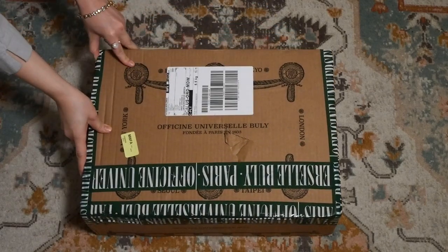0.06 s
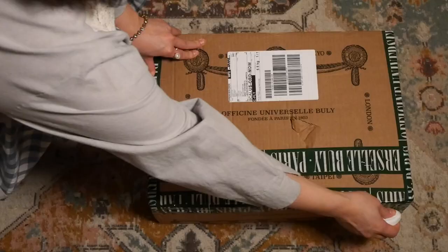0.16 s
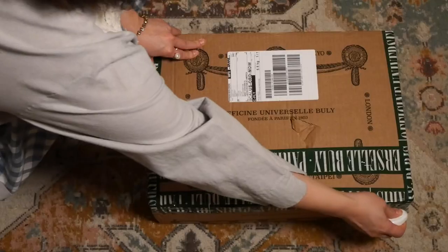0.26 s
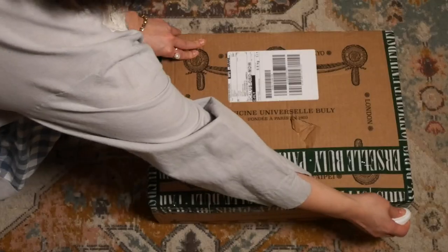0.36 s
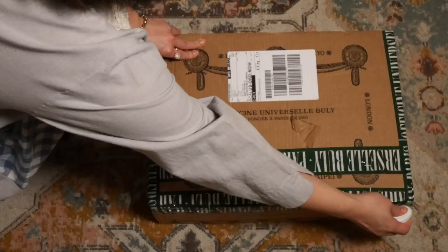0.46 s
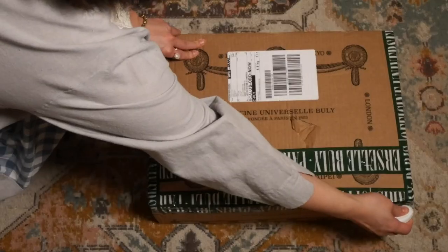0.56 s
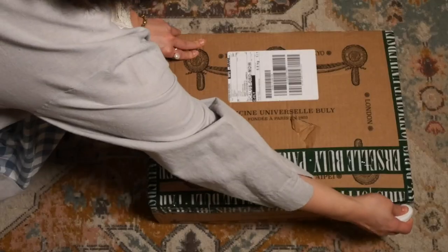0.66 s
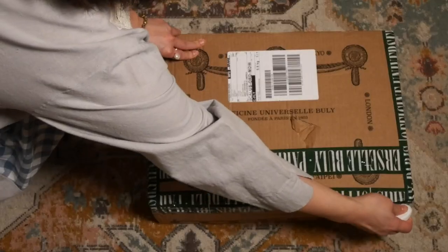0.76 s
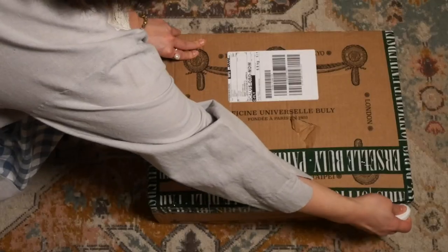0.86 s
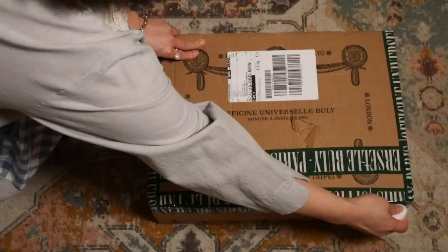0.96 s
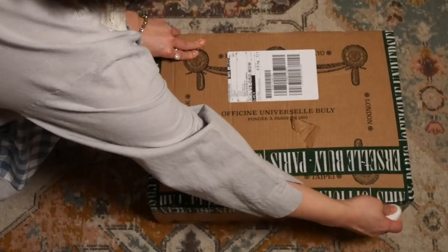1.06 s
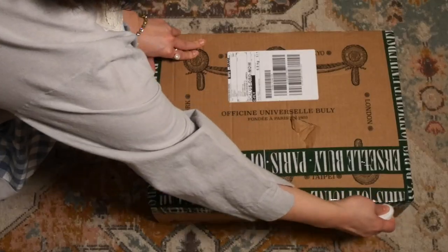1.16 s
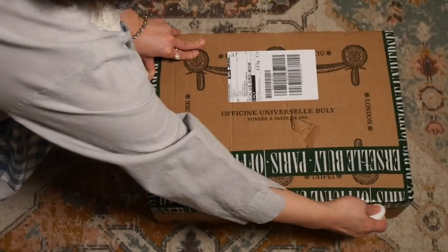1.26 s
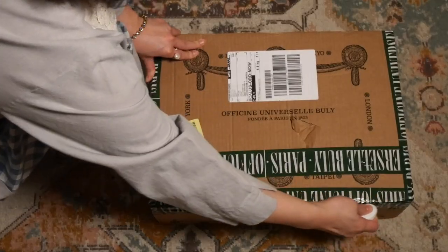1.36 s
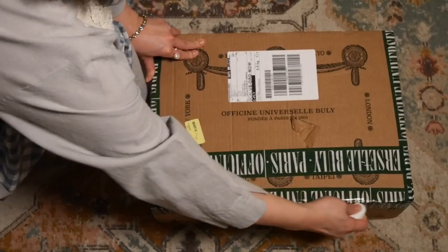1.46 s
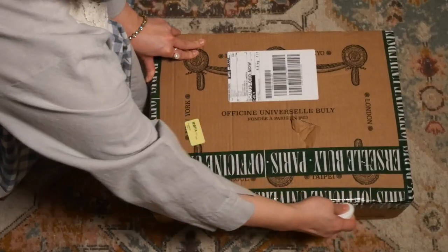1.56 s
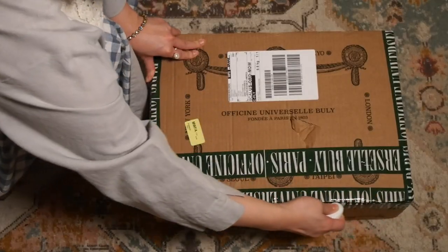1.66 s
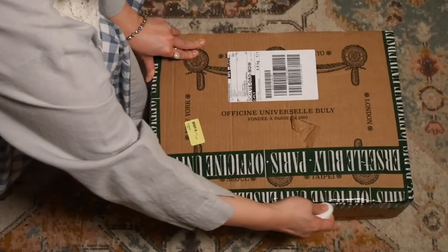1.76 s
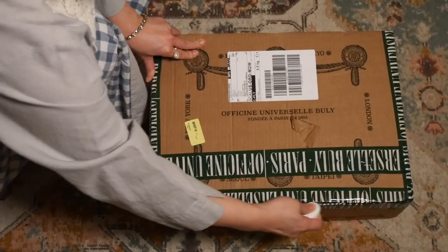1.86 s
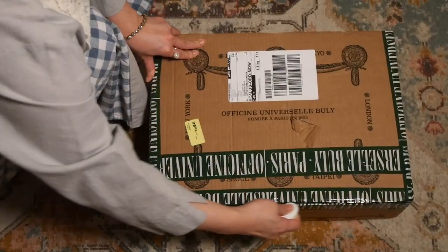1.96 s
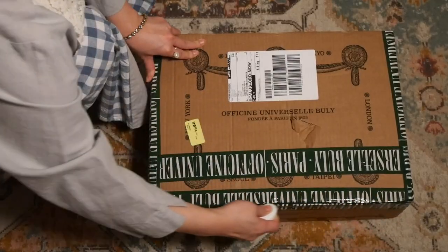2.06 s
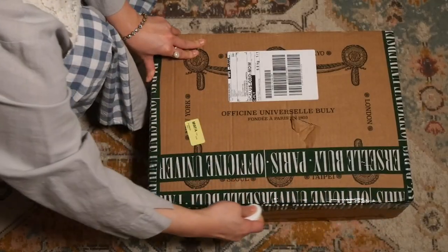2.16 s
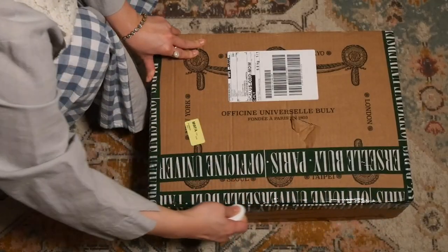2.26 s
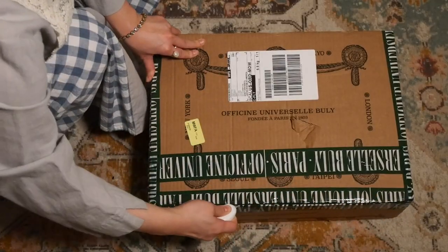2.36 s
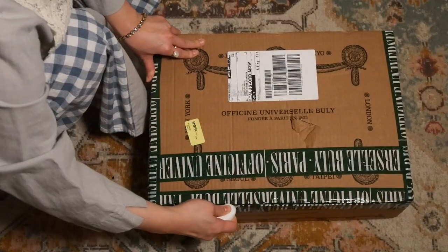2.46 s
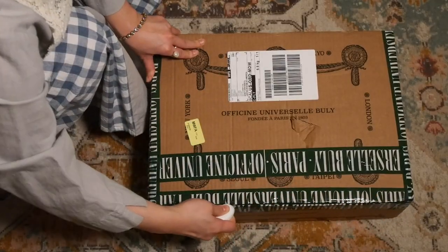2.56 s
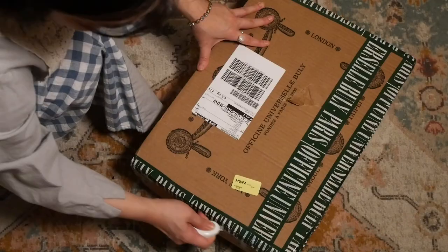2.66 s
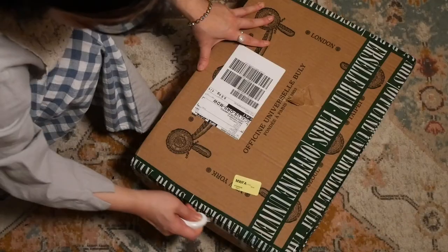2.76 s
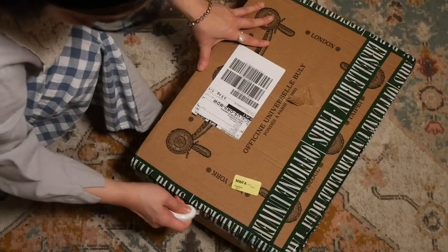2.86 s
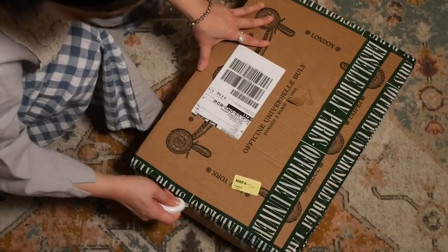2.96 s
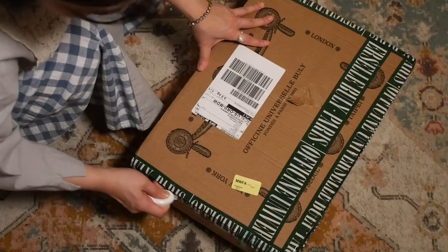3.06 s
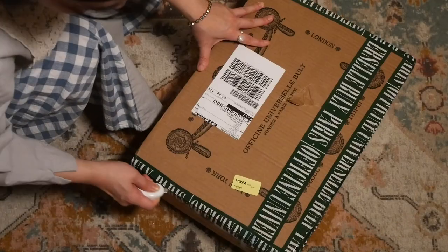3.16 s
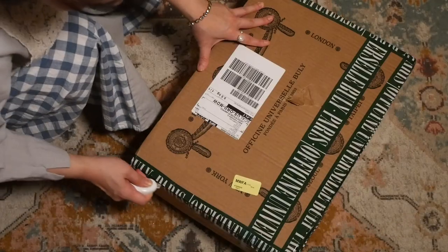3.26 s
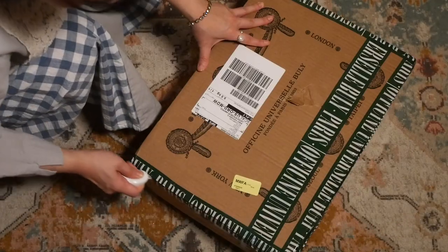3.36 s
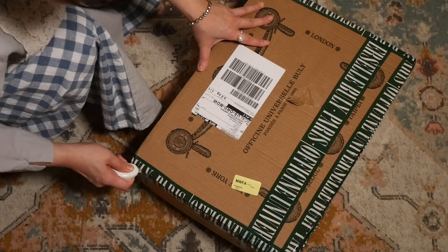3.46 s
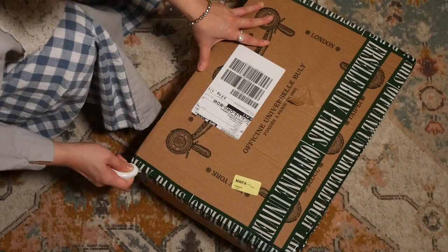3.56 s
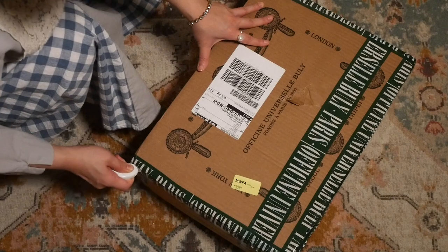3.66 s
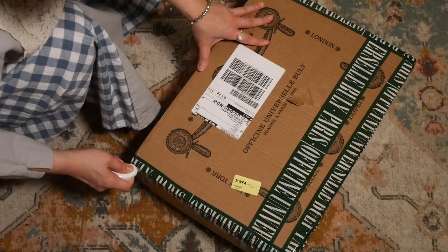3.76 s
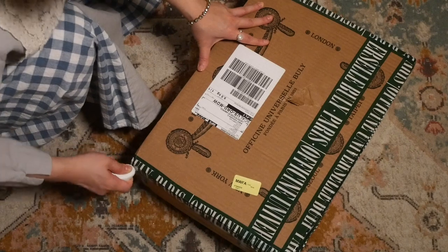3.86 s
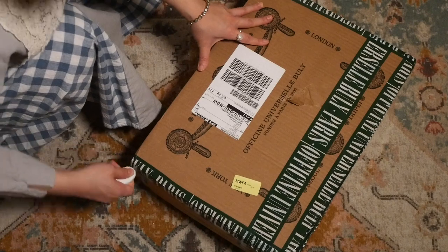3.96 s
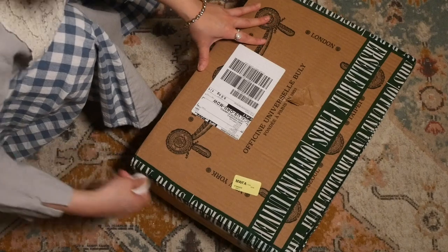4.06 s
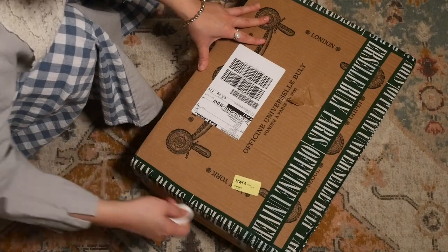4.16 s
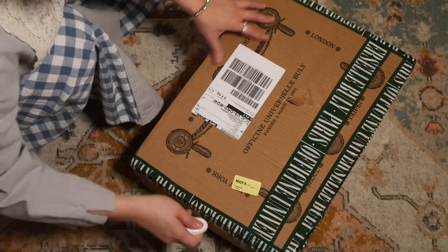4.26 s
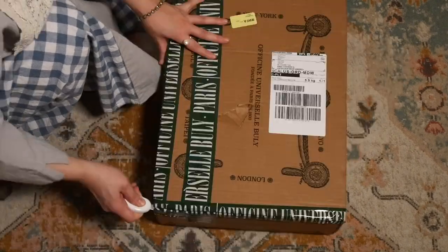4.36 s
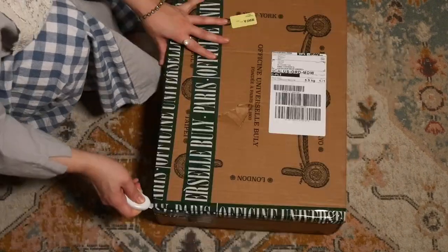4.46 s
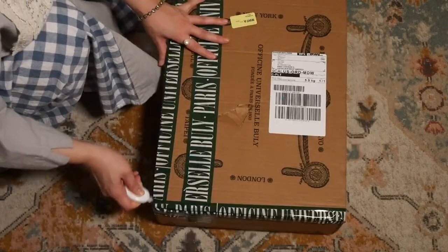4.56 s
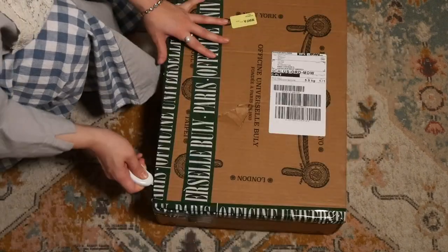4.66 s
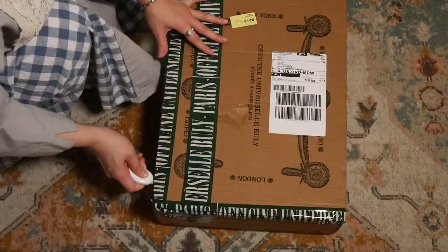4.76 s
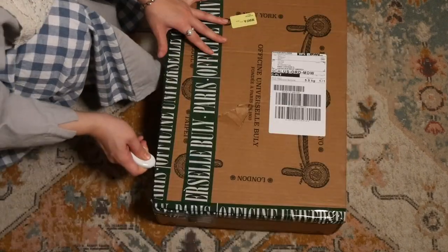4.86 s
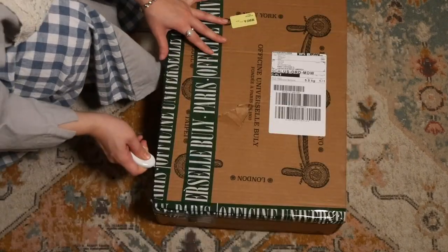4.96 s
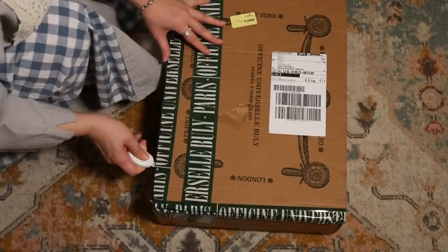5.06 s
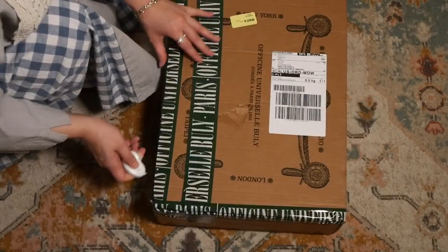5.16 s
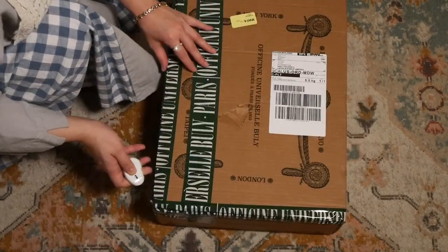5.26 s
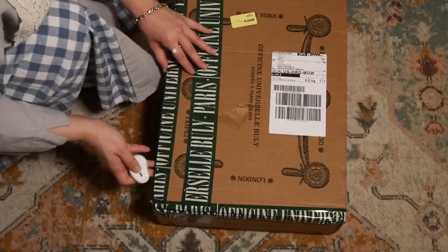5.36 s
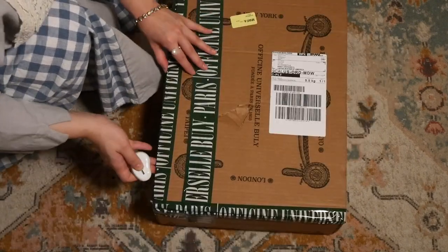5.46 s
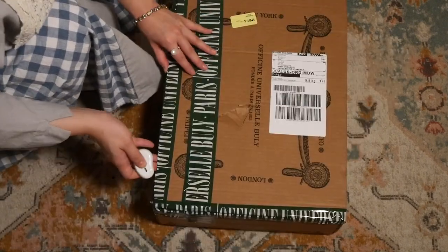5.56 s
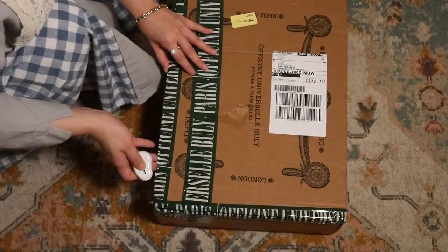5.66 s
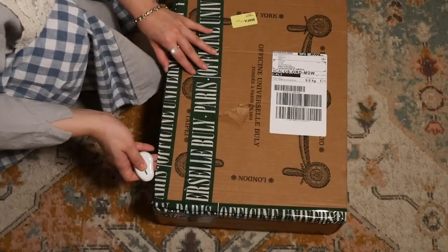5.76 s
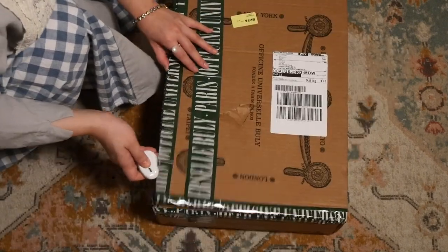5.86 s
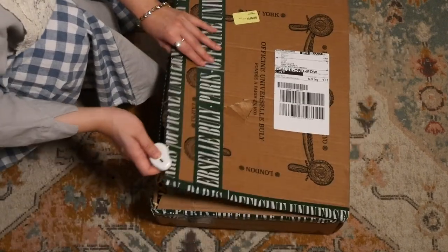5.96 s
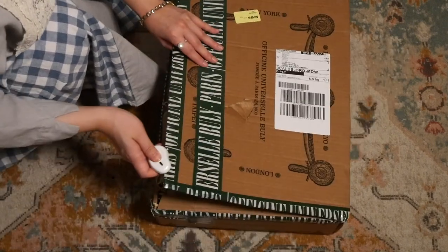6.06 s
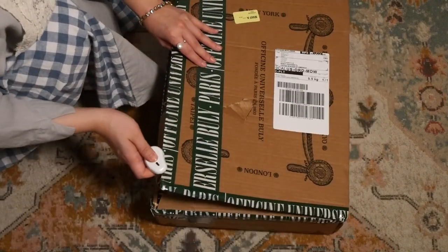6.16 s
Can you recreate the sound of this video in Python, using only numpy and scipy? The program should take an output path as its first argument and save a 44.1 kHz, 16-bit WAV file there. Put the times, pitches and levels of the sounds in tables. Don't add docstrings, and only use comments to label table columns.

```python
import sys
import numpy as np
from scipy import signal
from scipy.fft import rfft, irfft
from scipy.io import wavfile
from scipy.ndimage import uniform_filter1d

SR = 44100
rng = np.random.default_rng(int(sys.argv[2]) if len(sys.argv) > 2 else 0)


def put_to_file(sound):
    columns = np.atleast_2d(sound).T
    safe = np.clip(columns, -1, 1)
    whole_steps = np.round(safe * 32767)
    wavfile.write(sys.argv[1], SR, whole_steps.astype(np.int16))


def makeup_ratio(level_db):
    decades = np.asarray(level_db, float) / 20
    return 10 ** decades


N = 274302

# [f/Hz, level/dB per Hz]
HUSH_SPECTRUM = [(12, -41), (20, -10), (217, -5.5), (381, -7.5), (549, -17), (632, 6), (813, -22),
                 (1110, -8), (1470, -26), (2800, -20), (4000, -17.5), (6310, -19), (14700, -23),
                 (16400, -10.5)]
# [f/Hz, width/Hz, level/dB]
HUM_MODES = [(396, 44, 0.5), (614, 38, 3), (1048, 20, -0.5), (2120, 210, -10.5)]
HUSH_DB = -59
ROOM_T60_S, ROOM_DB, SIDE_DB = 0.19, -5, -24.5

# [f/Hz, width/Hz, level/dB]
PANEL_MODES = [(170, 33, 0), (282.5, 22, 4), (390, 9.8, -8.5), (513, 98, 8.5), (634.6, 21, 5),
               (742, 37, 4.5), (891, 31, -4), (1110, 70, 8), (1280, 250, -14), (1570, 520, 33.5)]
STAGE_STARTS_S = [
    2.52,
    3.31,
    4.4,
    5.74,
]
# [f/Hz, level/dB per Hz]
STAGE_RUMBLE = [
    [(120, -64), (210, -5), (288, 5.5), (426, 1), (1050, -1.5), (1620, -12), (2200, -10.5), (2860, -42),
     (4840, -120)],
    [(120, -62), (210, -12), (324, -6), (509, -2), (676, -6.5), (1350, -4.5), (2200, -17), (2860, -61),
     (4840, -120)],
    [(120, -43), (180, -8), (300, -6.5), (480, -3), (650, -5.5), (1100, -9), (2200, -17.5), (2860, -64),
     (4840, -120)],
    [(120, -40), (210, -11), (398, -2.5), (964, -11.5), (1400, -16), (1650, -23.5), (2200, -14.5),
     (2860, -60), (4840, -120)],
    [(120, -36), (210, -6), (354, -11.5), (398, -5.5), (556, -9.5), (650, -8.5), (2200, -20), (2860, -62),
     (4840, -120)],
]
# [f/Hz, level/dB per Hz]
STAGE_HISS = [
    [(1120, 5), (1900, -5), (2500, -5.5), (3100, -2), (3810, -2), (4130, -5), (4660, -3.5), (5760, -7.5),
     (6870, 2.5), (8500, -2.5), (11000, -17), (18700, -120)],
    [(1120, -13), (1900, -8), (2070, -10.5), (2980, -8), (3810, -4), (5910, -3), (6250, -0.5), (6830, -9),
     (8500, -8.5), (11000, -28), (18700, -120)],
    [(1120, -6), (1900, -4), (2600, -11.5), (3300, -1.5), (4600, -5.5), (5300, -3), (6250, -5),
     (8500, -9.5), (11000, -31), (18700, -120)],
    [(1120, -2), (1900, -3), (2910, -7), (3260, -2), (3910, -4.5), (4690, -7), (5350, -4), (5950, -2.5),
     (8500, -9), (11000, -62), (18700, -120)],
    [(1120, -24), (1900, -24), (2500, -13.5), (3200, -11), (4320, -14), (6250, -16), (8500, -19),
     (11000, -47), (18700, -120)],
]
# [f/Hz, level/dB per Hz]
RUSTLE_SPECTRUM = [(3820, -59), (6500, -7), (8460, -10), (9610, 5), (13600, 5), (15500, 1.5), (16100, -36),
                   (16400, -44)]
# [f/Hz, width/Hz]
AIR_MODES = [(120, 11), (170, 33), (175, 78), (154, 90), (158.5, 82)]
STAGE_CLUMP_DB = (2.15, 1.6, 2.06, 4.4, 3.3)
STAGE_RUSTLE_DB = (-5.5, -2.5, -1.5, -3.5, -3.5)
STAGE_AIR_DB = (-21, -16, -17, -13.5, -15.5)
RUSTLE_DB_PER_PRESS_DB, AIR_DB_PER_PRESS_DB = -0.18, 0.47

# [t/s, panel rumble level/dB]
HAND_SHIFTS = [(0, -50), (.046, -63), (.35, -60), (.67, -57), (.93, -53.5), (2.3, -53), (2.5, -68),
               (3.6, -67), (3.75, -53.5), (4.1, -61.5), (4.46, -76), (5.01, -61), (5.24, -70),
               (5.45, -61.5), (5.52, -55), (5.75, -44), (5.8, -70), (6.22, -65)]
HAND_HISS_DB, HAND_AIR_DB = -10.5, -6.5
# [t/s, blade speed as hiss level/dB, pressure as rumble above hiss/dB]
BLADE_CUTS = [
    [(.93, -75, 5), (.945, -56.5, 0), (1.066, -47, 2.5), (1.13, -46.5, 6), (1.228, -36.5, -6.5),
     (1.322, -40.5, -2.5), (1.47, -38.5, -4), (1.864, -37.5, -4.5), (2.033, -41.5, 9.5), (2.2, -50, -9)],
    [(2.66, -32, -2), (2.79, -31, -3.5), (2.872, -32, -2.5), (3.01, -31, -5), (3.206, -32.5, -1),
     (3.298, -41, -2.5), (3.366, -34, 3), (3.49, -37, 1.5), (3.6, -95, 18)],
    [(4.2, -58, -24), (4.259, -48, -2.5), (4.358, -52.5, -1.5)],
    [(4.548, -47, -5), (4.584, -36, 0.5), (4.656, -28.5, 4.5), (4.785, -70, 12)],
]
# [peak t/s, hiss level/dB, rise/ms per 20 dB, fall/ms per 20 dB, rumble above hiss/dB]
BLADE_JERKS = [(.37, -66, 104, 116, 13), (.722, -67, 60, 300, -7), (1.488, -32.5, 38, 106, 2),
               (1.881, -45, 18, 85, 15.5), (1.96, -35.5, 61, 145, -31), (2.205, -35.5, -5, 62, 3.5),
               (2.332, -37.5, 60, 80, -14), (2.395, -47, 90, 68, 0.5), (2.612, -41, 64, 75, -1),
               (3.324, -38.5, 2, 120, 9.5), (3.831, -40, 68, 106, -2), (3.962, -38, 17, 95, 1),
               (4.153, -44, 27, 68, -27), (4.506, -54, 31, 250, 9.5), (4.794, -36.5, 1.5, 119, 3.5),
               (4.867, -40.5, 85, 39, 10.5), (5.173, -52.5, 194, 191, 2), (5.523, -60.5, 20, 389, -16),
               (5.768, -46.5, 31, 150, 14), (5.844, -34, 111, 100, 3.5), (6.124, -45, 1, 300, -1.5)]
# [t/s, speed as hiss level/dB, pressure as rumble above hiss/dB]
LID_TEAR = [
    (5.862, -21, 6),
    (5.892, -23.5, 6),
    (5.897, -18, 5.5),
    (5.966, -30.5, 1),
    (5.972, -30, 12),
    (6.015, -28.5, 2.5),
    (6.038, -46.5, 13.5),
    (6.115, -51.5, 3.5),
    (6.2, -80, 0),
]
# [t/s, f/Hz, level above hiss/dB]
BLADE_RING = [(.85, 4100, -17), (.95, 4100, -6), (1.1, 3840, -13), (1.25, 3750, -23), (1.3, 6900, -26),
              (1.43, 6900, -18), (1.5, 7100, -43), (2.5, 4900, -13), (2.7, 4860, -12), (2.9, 6300, -18),
              (3.12, 6250, -31), (3.2, 5170, -7.5), (3.36, 4960, -6), (3.9, 4660, -57), (4.5, 5800, -24),
              (4.66, 6100, -4), (4.8, 5800, 7), (4.9, 6160, -10), (5.2, 5000, -49), (6.2, 3960, -24)]

# [t/s, f/Hz, level/dB, length/s]
SQUEAKS = [(1.536, 3260, -39, 0.019), (1.638, 2930, -38.5, 0.017), (1.675, 2950, -44, 0.019),
           (1.755, 4340, -40, 0.014), (5.92, 2840, -24.5, 0.014), (5.987, 1270, -24.5, 0.018),
           (5.802, 1210, -36, 0.016), (4.607, 4650, -35, 0.065), (5.09, 3160, -57, 0.021),
           (6.126, 1050, -42, 0.019), (6.132, 2330, -48.5, .026), (6.145, 1080, -43, .04),
           (6.179, 1080, -50, 0.027), (.03, 626, -64.5, 0.55), (.12, 1093, -66, 0.41),
           (.42, 1060, -65, .28), (.72, 1050, -61, 0.16), (.7, 2200, -68, 0.14), (.69, 4380, -67.5, .18),
           (.94, 880, -56, 0.053), (1.01, 390, -47, 0.18), (3.15, 192.7, -50, .13),
           (3.345, 175, -39, 0.098), (3.42, 640, -45, 0.053), (3.435, 470, -38, 0.041),
           (4.24, 860, -52, 0.11), (4.29, 320, -57, 0.06), (4.86, 390, -50, 0.11), (5.293, 1460, -62, .045),
           (5.293, 2570, -59.5, 0.033), (5.48, 610, -58.5, 0.13), (5.805, 270, -38, 0.026),
           (5.988, 995, -24, 0.018), (1.07, 720, -51, 0.058), (1.13, 820, -47, 0.053),
           (1.19, 774, -42.5, 0.053), (1.26, 900, -48.5, 0.047), (2.1, 170, -48.5, 0.089),
           (2.34, 170, -55, 0.083), (3.5, 115, -67, 0.31), (4.9, 110, -58, .1), (5.862, 172, -28, 0.1),
           (5.968, 208, -33.5, 0.068), (3.125, 101, -57, 0.43), (.58, 105, -60, 0.21),
           (4.273, 11500, -53, .09)]
# [t/s, peak level/dB, centre f/Hz]
CUTTER_TICKS = [(.26, -45, 5500), (.327, -39, 4770), (.3561, -33.5, 3070), (.377, -36, 2900),
                (.711, -36, 9000), (0.7155, -28.5, 4560), (.802, -43, 9000), (.735, -40, 4600),
                (.807, -33, 4300), (.85, -50, 4470), (.9512, -35, 4110), (0.976, -26, 4540),
                (3.643, -32, 4630), (3.78, -42, 4600), (4.38, -40, 4000), (5.525, -35.5, 2300),
                (5.623, -40, 6000), (5.0631, -37, 3310), (5.112, -25, 3080), (5.174, -26, 4430),
                (5.2046, -31, 5200), (5.297, -29, 4670), (5.5265, -31, 12000), (5.648, -24.5, 3600)]
# [t/s, level/dB, panel f/Hz]
PANEL_KNOCKS = [(0.282, -27.5, 300), (0.7146, -41, 274), (.807, -43, 500), (0.9519, -44, 872),
                (1.8846, -28, 300), (1.939, -22, 570), (1.9808, -26, 325), (2.0069, -28, 300.5),
                (2.0187, -25.5, 170), (2.144, -30, 754), (2.3317, -40, 1110), (2.367, -35.5, 886),
                (2.6599, -62, 503), (3.3528, -18.5, 465), (3.703, -38, 500), (3.74, -39.5, 600),
                (3.8036, -32, 513), (3.9744, -25.5, 560), (4.495, -34, 485), (4.5519, -27, 467),
                (4.587, -39, 430), (4.6551, -19, 352), (4.794, -32, 282), (4.809, -34, 270),
                (4.847, -20.5, 620), (4.87, -26.5, 262), (4.8645, -20.5, 390), (5.1113, -36, 514),
                (5.1736, -45, 935), (5.6477, -34, 557)]
# [t/s, level/dB, panel f/Hz]
LID_SLAMS = [(5.768, -20, 271), (5.8045, -32, 700), (5.8592, -12, 430), (5.864, -10, 280),
             (5.889, -26, 141), (5.8967, 0.5, 398), (5.9001, -1.5, 650), (5.9144, -15, 710),
             (5.9232, -12.5, 274), (5.9706, -13.5, 396), (6.005, -30, 305), (5.9905, -18, 1000)]
# [t/s, f/Hz, level/dB]
PANEL_DRONES = [
    [(.95, 113.2, -70), (1.08, 118.5, -50), (1.16, 115.8, -71), (1.245, 121.4, -45), (1.3, 125.2, -65),
     (1.5, 129, -46), (1.56, 123.8, -47), (1.62, 120, -43), (1.71, 120, -49), (1.75, 126.5, -40),
     (1.88, 123, -47.5), (1.95, 127.2, -53), (2.1, 123.7, -54), (2.2, 120, -75)],
    [(2.66, 524.3, -49), (2.685, 518, -39), (2.73, 513, -60), (2.8, 455, -44), (2.86, 503, -45.5),
     (2.922, 526.5, -35.5), (2.98, 509, -44), (3.03, 510, -63), (3.16, 506, -48), (3.19, 486, -53),
     (3.24, 478, -63)],
]
# [t/s, peak level/dB]
FLUTE_BUMPS = [(1.1402, -21), (1.1815, -48), (1.2054, -22), (1.466, -20), (1.487, -19), (1.513, -20.5),
               (1.5412, -18.5), (1.576, -13), (1.6084, -18.5), (1.643, -17.5), (1.678, -17.5),
               (1.718, -16.5), (1.7577, -18), (1.7968, -19), (1.831, -17.5), (1.8711, -13.5)]
BUMP_LAG_S, BUMP_WIDTH_S, BUMP_HISS_DB, BUMP_PRESS_DB = 0.0068, 0.0091, -15.5, -13.5
# [t/s, peak level/dB, centre f/Hz, t60/s]
FIBRE_SNAPS = [(1.8844, -11, 2370, 0.12), (1.9397, -8, 9000, 0.0091), (1.9405, -13, 9000, 0.067),
               (2.0061, -7, 10800, 0.012), (2.007, -6.5, 8800, 0.11), (2.0188, -6.5, 6200, 0.045),
               (2.139, -30, 4900, 0.027), (2.144, -18, 7460, 0.12), (2.2055, -15, 5780, 0.024),
               (2.211, -19, 4940, 0.035), (2.337, -12.5, 4660, 0.069), (2.367, -15, 4300, 0.034),
               (2.6599, -22, 4830, .06), (3.3223, -28, 4960, .055), (3.3528, -6.5, 4730, 0.13),
               (3.8036, -20, 4300, 0.13), (3.9571, -8.5, 5550, 0.025), (3.9748, -16, 5200, 0.082),
               (4.1535, -5, 7560, .02), (4.1556, -2.5, 6000, .012), (4.1589, -4.5, 8850, 0.025),
               (4.1714, -14, 7650, 0.039), (4.5515, -19.5, 3540, 0.031), (4.5864, -11, 5930, 0.049),
               (4.632, -15, 5000, .03), (4.6544, -18, 5600, 0.034), (4.672, -14.5, 6500, 0.039),
               (4.7928, -18, 4200, .03), (4.847, -11.5, 5230, 0.041), (4.8601, -9, 5800, 0.014),
               (4.8644, -9, 5840, 0.055)]
# [t/s, peak level/dB, centre f/Hz]
GLUE_POPS = [(5.7687, -16, 6550), (5.774, -20, 6460), (5.8061, -19, 3670), (5.8294, -16, 5000),
             (5.8594, 1, 4000), (5.8703, 5.5, 5660), (5.887, 3, 5060), (5.897, 5.5, 3020),
             (5.9255, -3, 3530), (5.9711, -3.5, 3560), (5.975, -16, 5500), (5.9884, -6, 3670),
             (6.1234, -20, 7700)]
POP_T60_S, TICK_T60_S = 0.035, 0.038
# [t/s, f/Hz, level/dB, t60/s]
LID_PUFF = (5.94, 33, -46, .6)


def rms_one(x):
    return x / np.sqrt(np.mean(x ** 2) + 1e-20)


def filtered(x, order, hz, kind):
    return signal.sosfilt(signal.butter(order, hz, kind, fs=SR, output="sos"), x)


def colour(x, spectrum):
    hz = np.maximum(np.arange(N // 2 + 1) * SR / N, 1)
    point_hz, point_db = np.transpose(spectrum)
    gain_db = np.interp(np.log(hz), np.log(point_hz), point_db)
    return rms_one(irfft(rfft(x) * makeup_ratio(gain_db), N))


def peak(hz, width_hz):
    r = np.exp(-np.pi * max(width_hz, 5) / SR)
    return (1 - r * r) / 2 * np.array([1, 0, -1]), [1, -2 * r * np.cos(2 * np.pi * hz / SR), r * r]


def body(x, modes):
    out = 0
    for k, (hz, width_hz, db) in enumerate(modes):
        out = out + (-1) ** k * makeup_ratio(db) * signal.lfilter(*peak(hz, width_hz), x)
    return out


def drift(rate_hz):
    r = np.exp(-64 * np.pi * rate_hz / SR)
    slow = signal.lfilter([1], [1, -2 * r, r * r], rng.standard_normal(N // 32 + 2002))[2000:]
    return np.interp(np.arange(N) / 32, np.arange(len(slow)), rms_one(slow))


def in_time(rows):
    s, *columns = np.transpose(rows)
    return [np.interp(np.arange(N) / SR, s, column) for column in columns]


def stage_now():
    return np.searchsorted(STAGE_STARTS_S, np.arange(N) / SR)


def by_stage(x, spectra):
    return np.choose(stage_now(), [colour(x, spectrum) for spectrum in spectra])


def wandering(x, modes, swing_db, rate_hz):
    out = 0
    for mode in modes:
        out = out + makeup_ratio(swing_db * np.tanh(drift(rate_hz))) * rms_one(body(x, [mode]))
    return rms_one(out)


def bursts(rows, rise_s, crack, ring, low, top):
    out, t = np.zeros(N + 8192), np.arange(8192) / SR
    for s, peak_db, hz, t60_s in rows:
        burst = rng.standard_normal(8192) * makeup_ratio(-60 * t / max(t60_s, .005)) * (1 - np.exp(-t / rise_s))
        burst += crack * np.cos(2 * np.pi * hz * t) * np.exp(-t / .00014)
        burst = burst + ring * signal.lfilter(*peak(hz, 0.35 * hz), burst)
        burst = filtered(burst, 2, [low * hz, min(top * hz, .45 * SR)], "band")
        burst = filtered(burst, 2, low * hz, "high")
        out[round(s * SR):][:8192] += makeup_ratio(peak_db) * burst / np.abs(burst).max()
    return out[:N]


def hush():
    white = rng.standard_normal(N)
    hum = rms_one(body(white, HUM_MODES))
    return makeup_ratio(HUSH_DB) * (colour(white, HUSH_SPECTRUM) + makeup_ratio(-10.5) * hum)


def room(x):
    t = np.arange(SR // 2) / SR
    tail = rng.standard_normal(len(t)) * makeup_ratio(-60 * t / ROOM_T60_S) * np.clip((t - .003) / 0.00018, 0, 1)
    return signal.fftconvolve(x, tail / np.sqrt(np.sum(tail ** 2)))[:N]


def motion():
    t = np.arange(N) / SR
    for cut in BLADE_CUTS + [LID_TEAR]:
        speed_db, press_db = in_time(cut)
        outside_s = np.maximum(np.maximum(cut[0][0] - t, t - cut[-1][0]), 0)
        yield speed_db - 8000 * outside_s, press_db
    swells_db = [db + BUMP_HISS_DB - 6 * ((t - s - BUMP_LAG_S) / BUMP_WIDTH_S) ** 2 for s, db in FLUTE_BUMPS]
    yield np.max(swells_db, axis=0), BUMP_PRESS_DB
    for s, db, rise_ms, fall_ms, press_db in BLADE_JERKS:
        yield db - 20000 * np.maximum((s - t) / max(rise_ms, 2), (t - s) / max(fall_ms, 2)), press_db


def friction():
    hands_db, = in_time(HAND_SHIFTS)
    hiss = rustle = makeup_ratio(2 * (hands_db + HAND_HISS_DB))
    panel = air = 0
    for speed_db, press_db in motion():
        power = makeup_ratio(2 * speed_db)
        hiss = hiss + power
        panel = panel + power * makeup_ratio(2 * press_db)
        rustle = rustle + power * makeup_ratio(2 * RUSTLE_DB_PER_PRESS_DB * press_db)
        air = air + power * makeup_ratio(2 * (1.5 + AIR_DB_PER_PRESS_DB) * press_db)
    stage, hands = stage_now(), makeup_ratio(2 * hands_db)
    air = air * makeup_ratio(2 * np.array(STAGE_AIR_DB)[stage]) + hands * makeup_ratio(2 * HAND_AIR_DB)
    hiss_db, rustle_db, panel_db, air_db = 10 * np.log10([hiss, rustle, panel + hands, air])
    return hiss_db, rustle_db + np.array(STAGE_RUSTLE_DB)[stage], panel_db, air_db


def grains(per_s, spread_db, clump):
    sizes = makeup_ratio(spread_db * np.minimum(rng.exponential(1, N), 5)) * rng.choice([-1, 1], N)
    clump_db = clump * np.array(STAGE_CLUMP_DB)[stage_now()]
    slips = rng.random(N) < per_s / SR
    return sizes * slips * makeup_ratio(clump_db * drift(24.7)) + 1e-18


def blade_ring(x, centre_hz, width_hz):
    out, state = np.zeros(N), np.zeros(2)
    for i in range(0, N, 256):
        out[i:i + 256], state = signal.lfilter(*peak(centre_hz[i], width_hz), x[i:i + 256], zi=state)
    return rms_one(out)


def rubbing():
    hiss_db, rustle_db, panel_db, air_db = friction()
    ring_hz, ring_db = in_time(BLADE_RING)

    slips = rms_one(grains(per_s=13000, spread_db=2.5, clump=0.69))
    film_hz = np.geomspace(2100, 13000, num=16) * makeup_ratio(0.35 * rng.standard_normal(16))
    film = [(hz, 0.028 * hz, 0) for hz in film_hz]
    taut = slips + makeup_ratio(-9) * wandering(slips, film, swing_db=9, rate_hz=12)
    hiss = by_stage(taut, STAGE_HISS) + makeup_ratio(ring_db) * blade_ring(slips, ring_hz, width_hz=260)
    rustle = colour(taut, RUSTLE_SPECTRUM)

    coarse = rms_one(grains(per_s=4000, spread_db=2.5, clump=0.79))
    modal = wandering(coarse, PANEL_MODES[1:], swing_db=6.0, rate_hz=5.0)
    panels = by_stage(modal + makeup_ratio(11.5) * coarse, STAGE_RUMBLE)
    airs = [rms_one(body(body(coarse, [(hz, w, 0)]), [(hz, 70, 0)])) for hz, w in AIR_MODES]
    air = np.choose(stage_now(), airs)
    return (makeup_ratio(hiss_db - 5.5) * hiss + makeup_ratio(rustle_db - 8.5) * rustle
            + makeup_ratio(panel_db - 2.5) * panels + makeup_ratio(air_db - 3.0) * air)


def squeaks():
    out, t = np.zeros(N + 20480), np.arange(20480) / SR
    whites = rng.standard_normal((len(SQUEAKS), 24576))
    for (s, hz, db, length_s), white in zip(SQUEAKS, whites):
        size = min(int(length_s * SR), len(t))
        swell = np.sin(np.pi * t[:size] / length_s)
        modes = [(hz, 0.075 * hz, 0), (1.01 * hz, 0.17 * hz, -6)]
        tone = body(white[:4096 + size], modes)[4096:]
        out[round(s * SR):][:size] += makeup_ratio(db) * swell * rms_one(tone)
    return out[:N]


def ticks():
    rows = [(*row, TICK_T60_S) for row in CUTTER_TICKS]
    return makeup_ratio(-11.0) * bursts(rows, rise_s=0.0005, crack=4.0, ring=4.0, low=0.22, top=2.3)


def knocks():
    s, level_db, struck_hz = np.transpose(PANEL_KNOCKS + LID_SLAMS)
    at = np.round(s * SR).astype(int)
    scatter_db, out = 4.8 * rng.standard_normal((len(s), len(PANEL_MODES))), 0
    for k, (hz, width_hz, db) in enumerate(PANEL_MODES):
        push = np.zeros(N) + 1e-18
        off_db = -17 * np.abs(np.log2(hz / struck_hz))
        push_db = level_db + off_db + scatter_db[:, k] - 20.5
        push[at] = makeup_ratio(push_db) * SR / (np.pi * width_hz)
        out = out + body(push, [(hz, width_hz, db)]) * (-1) ** k
    soft = np.exp(-2 * np.pi * 1400 / SR)
    return signal.lfilter([(1 - soft) ** 2], [1, -2 * soft, soft * soft], out)


def thuds():
    out, t = np.zeros(N + 8192), np.arange(8192) / SR
    for s, db, hz in PANEL_KNOCKS + LID_SLAMS:
        swing = np.sin(2 * np.pi * hz * t) * makeup_ratio(-60 * t * hz / 14) * (1 - np.exp(-t * hz / 0.12))
        out[round(s * SR):][:8192] += makeup_ratio(db - 2.5) * swing
    return out[:N]


def drones():
    t, out = np.arange(N) / SR, 0
    for rows in PANEL_DRONES:
        hz, db = in_time(rows)
        outside_s = np.maximum(np.maximum(rows[0][0] - t, t - rows[-1][0]), 0)
        turns = np.cumsum(hz * (1 + 0.033 * drift(24.4))) / SR
        out = out + makeup_ratio(db - 2000 * outside_s + 3.0 + 2.8 * drift(32)) * np.sin(2 * np.pi * turns)
    return out


def flute_jolts():
    rows = [(*row, 900, .05) for row in FLUTE_BUMPS]
    return makeup_ratio(-18.5) * bursts(rows, rise_s=0.0023, crack=.1, ring=0.39, low=0.14, top=1.7)


def snaps():
    rows = FIBRE_SNAPS + [(*row, POP_T60_S) for row in GLUE_POPS]
    return makeup_ratio(-12.0) * bursts(rows, rise_s=.0003, crack=3.5, ring=2.5, low=.26, top=3)


def lid_puff():
    start_s, hz, db, t60_s = LID_PUFF
    since = np.maximum(np.arange(N) / SR - start_s, 0)
    return makeup_ratio(db - 60 * since / t60_s) * np.sin(2 * np.pi * hz * since) * np.minimum(since / 0.026, 1)


def ear_difference(mid):
    side = filtered(room(mid), 2, 15000, "low")
    brighter = side + 0.32 * np.diff(side, prepend=0)
    edges_hz = np.geomspace(60, 15000, num=10)
    patches = 0
    for band_hz in zip(edges_hz, edges_hz[1:]):
        patches = patches + makeup_ratio(9 * np.tanh(drift(8.1))) * filtered(brighter, 2, band_hz, "band")
    loud = np.sqrt(uniform_filter1d(mid ** 2, size=2048) + 1e-9)
    return makeup_ratio(SIDE_DB - 1.5) * patches / (1 + loud / 0.092)


def scene():
    hits = snaps() + ticks() + flute_jolts() + knocks() + thuds()
    rub = rubbing()
    box = rub + hits + room(makeup_ratio(ROOM_DB) * hits + makeup_ratio(-7.5) * rub)
    box = filtered(box, 2, 75, "high")
    mid = box + drones() + lid_puff() + squeaks() + hush()
    side = ear_difference(mid)
    return np.array([mid + side, mid - side])


def roll_off(x):
    return signal.sosfilt(signal.butter(12, 16650, fs=SR, output="sos"), x)


def record(dry):
    cut = filtered(dry, 2, 30, "high")
    rounded = cut / (1 + cut ** 4) ** .25
    top = signal.cheby2(12, 60, 16550, fs=SR, output="sos")
    mix = signal.sosfilt(top, rounded)
    return roll_off(mix)


dry = scene()
out = record(dry)
put_to_file(out)
```